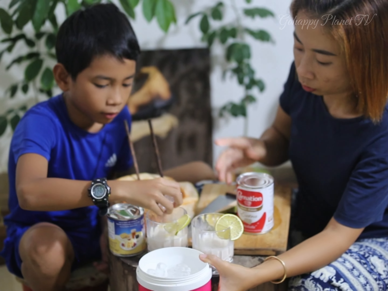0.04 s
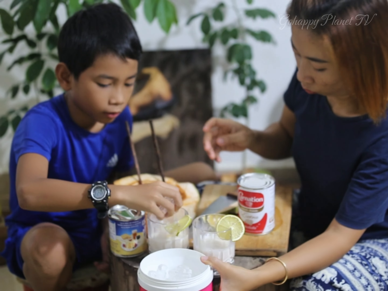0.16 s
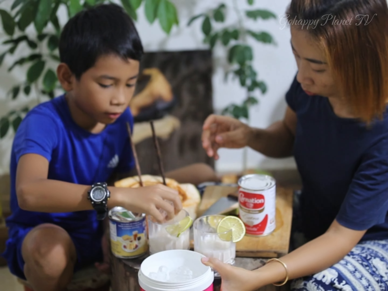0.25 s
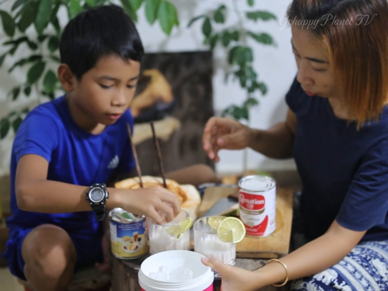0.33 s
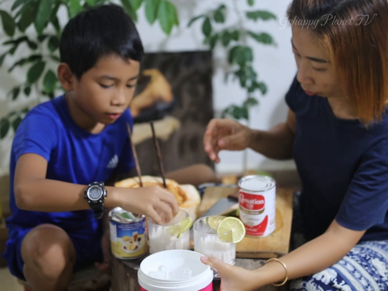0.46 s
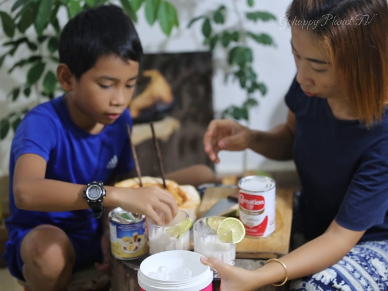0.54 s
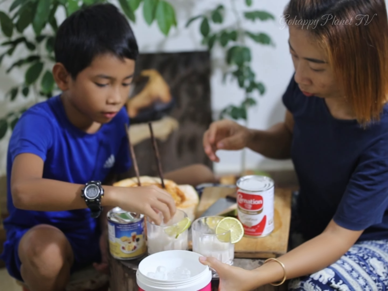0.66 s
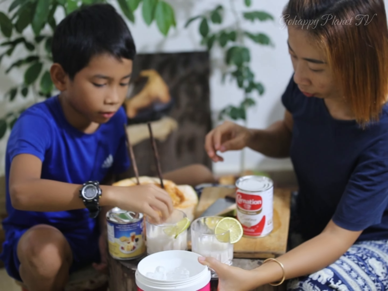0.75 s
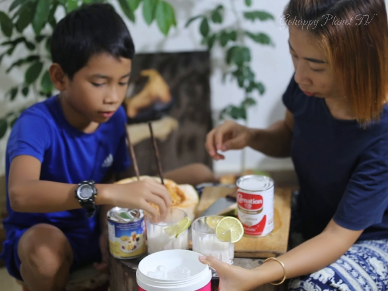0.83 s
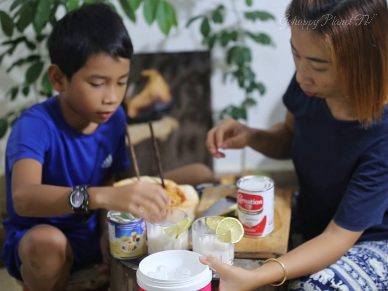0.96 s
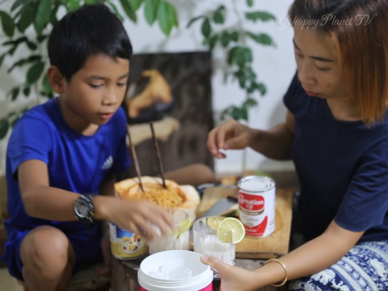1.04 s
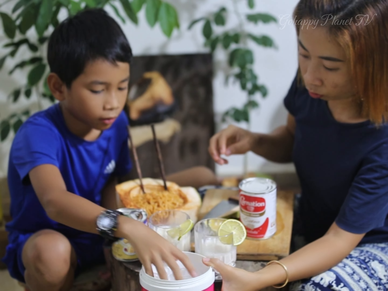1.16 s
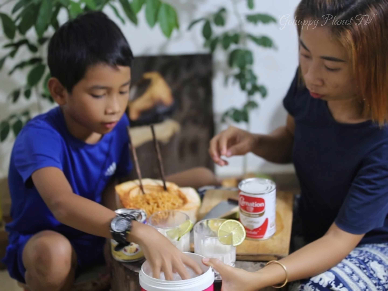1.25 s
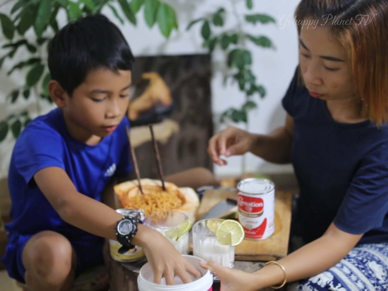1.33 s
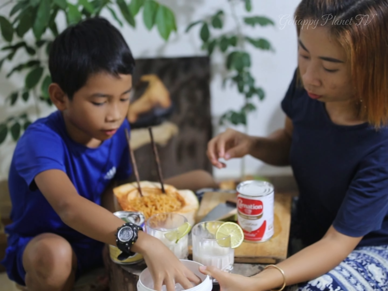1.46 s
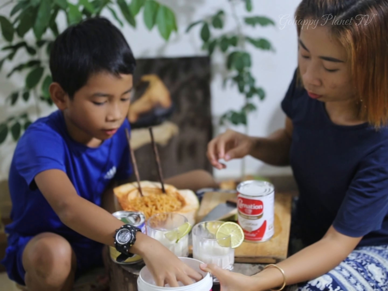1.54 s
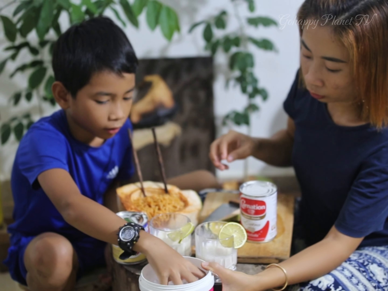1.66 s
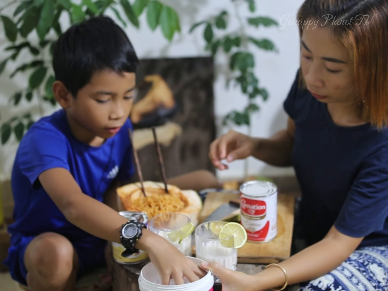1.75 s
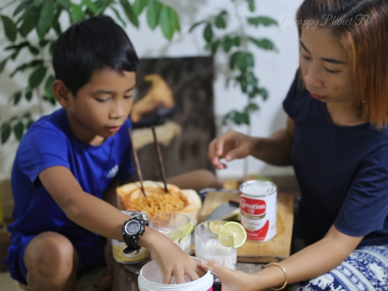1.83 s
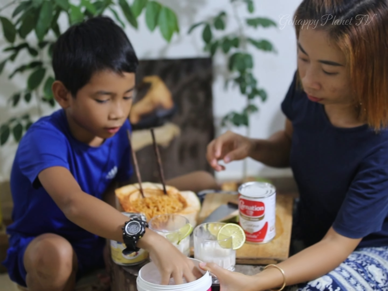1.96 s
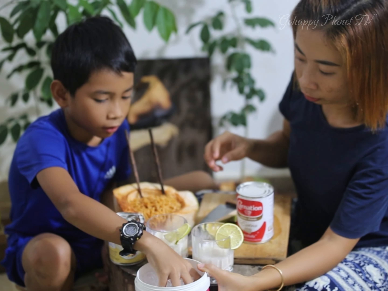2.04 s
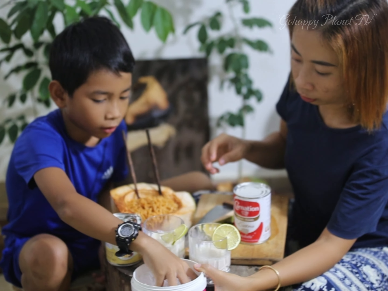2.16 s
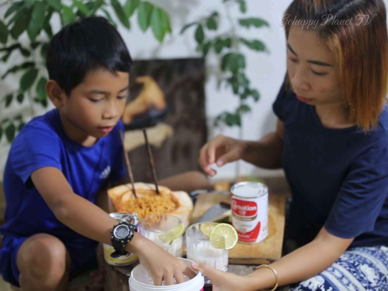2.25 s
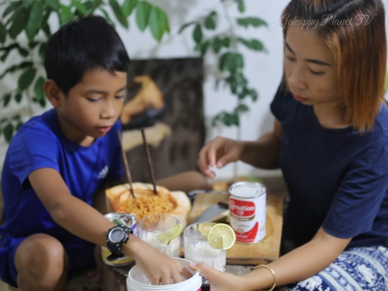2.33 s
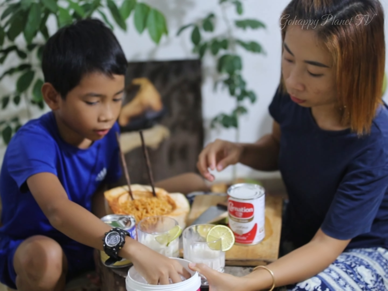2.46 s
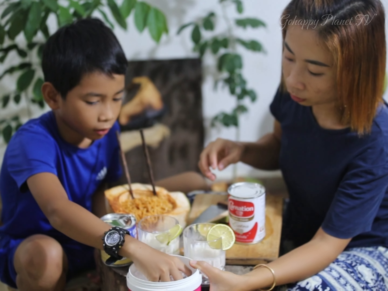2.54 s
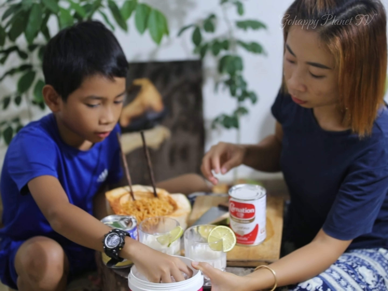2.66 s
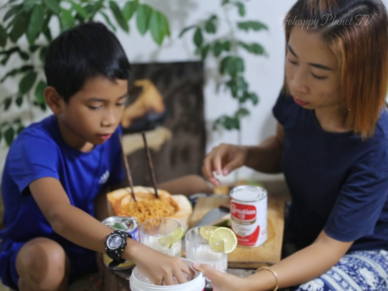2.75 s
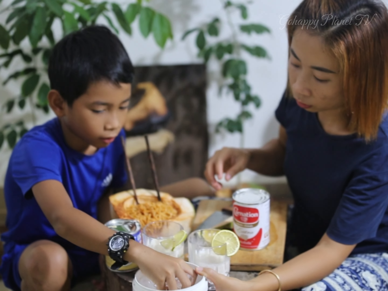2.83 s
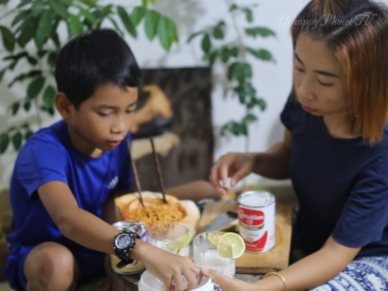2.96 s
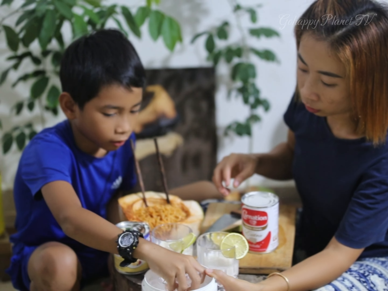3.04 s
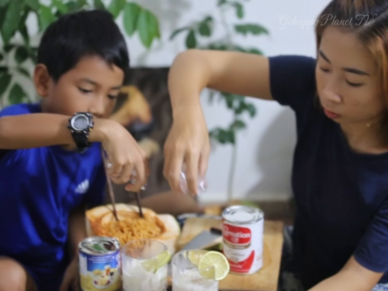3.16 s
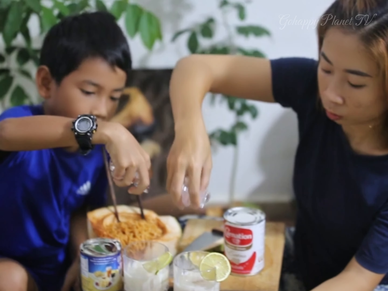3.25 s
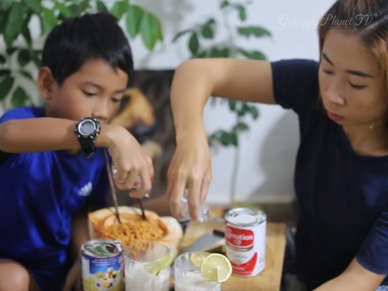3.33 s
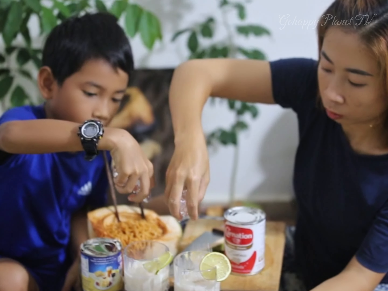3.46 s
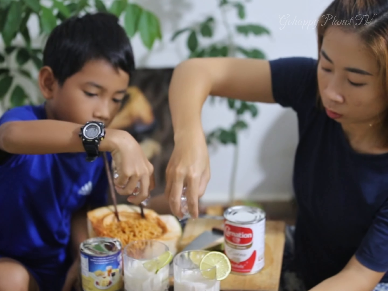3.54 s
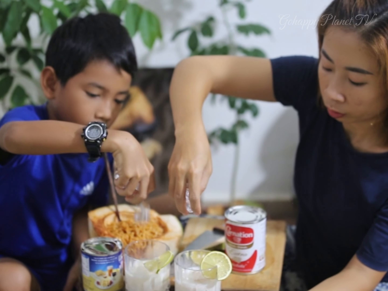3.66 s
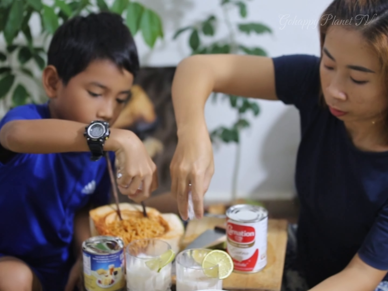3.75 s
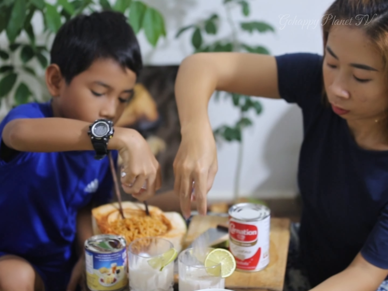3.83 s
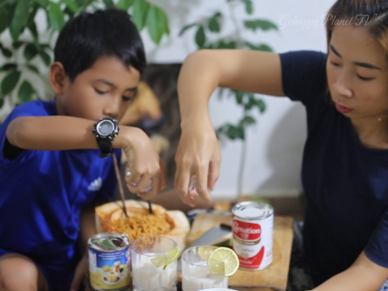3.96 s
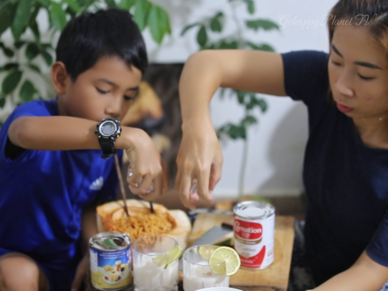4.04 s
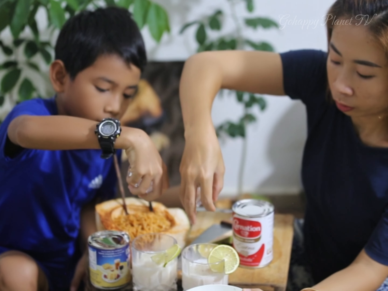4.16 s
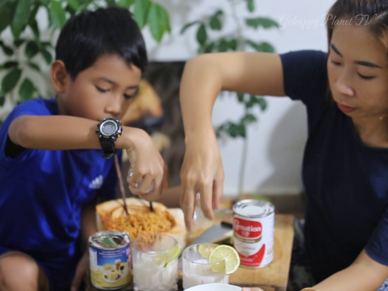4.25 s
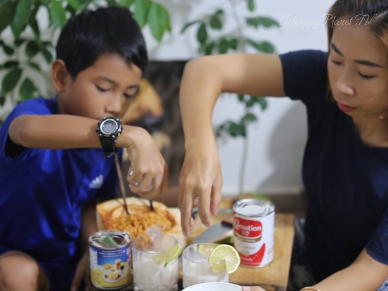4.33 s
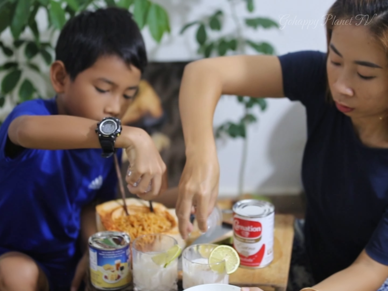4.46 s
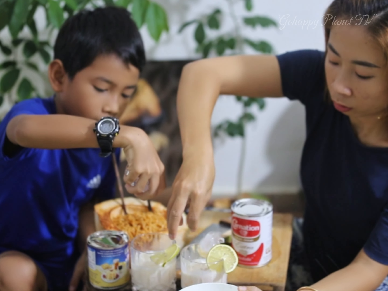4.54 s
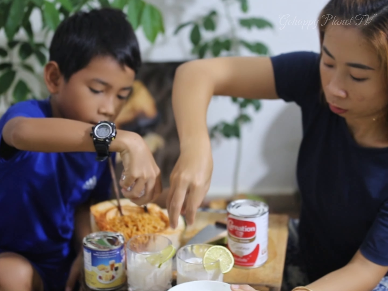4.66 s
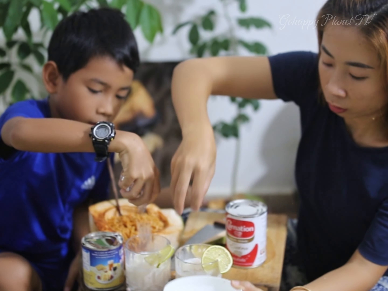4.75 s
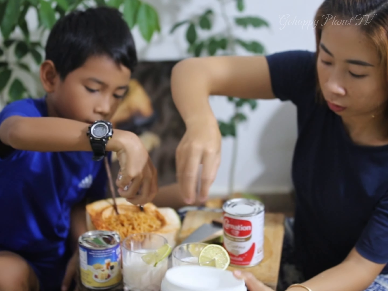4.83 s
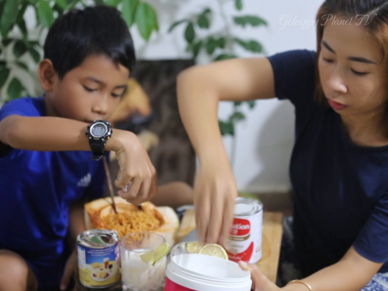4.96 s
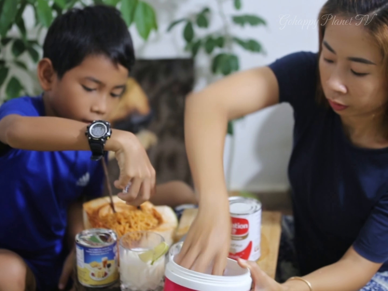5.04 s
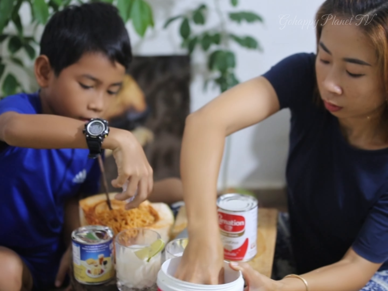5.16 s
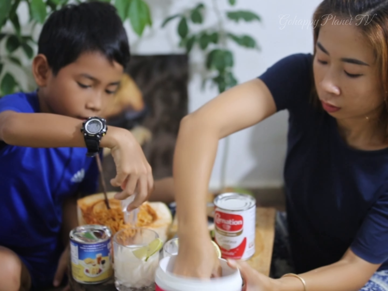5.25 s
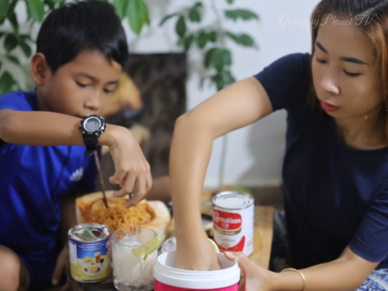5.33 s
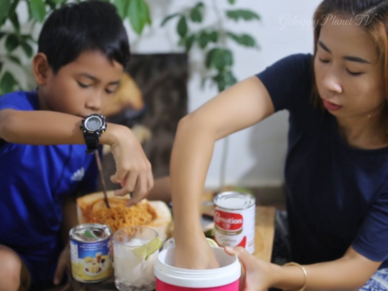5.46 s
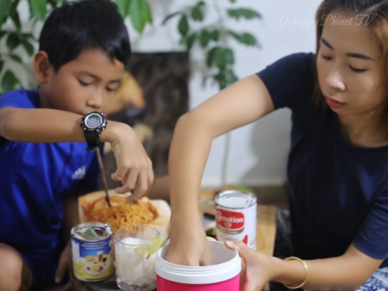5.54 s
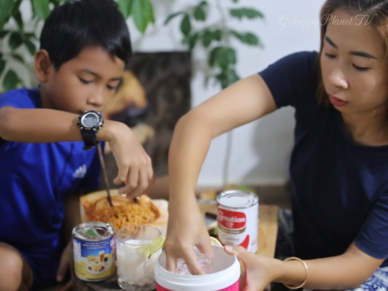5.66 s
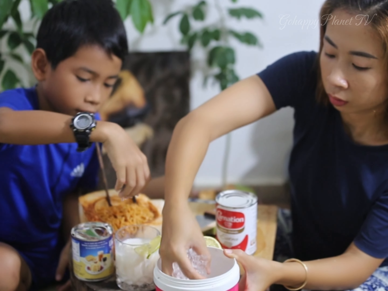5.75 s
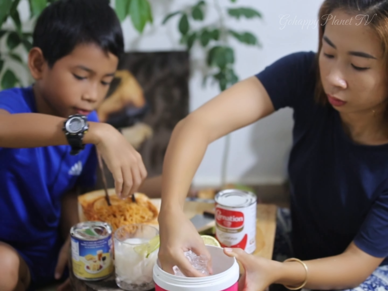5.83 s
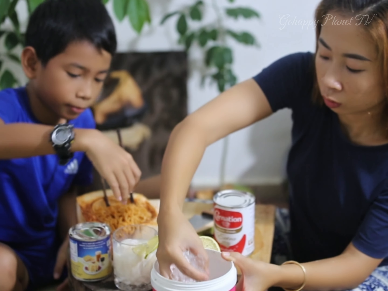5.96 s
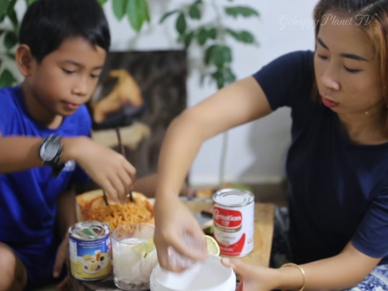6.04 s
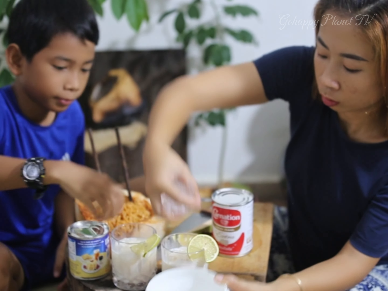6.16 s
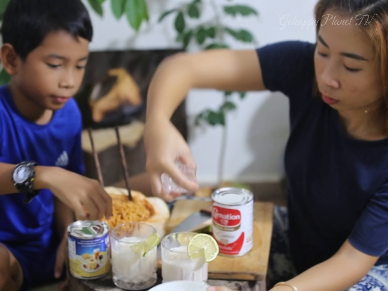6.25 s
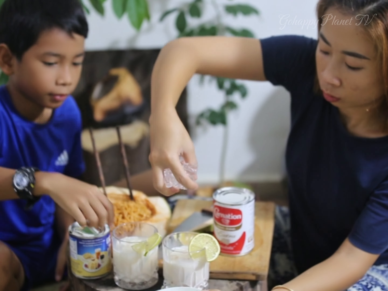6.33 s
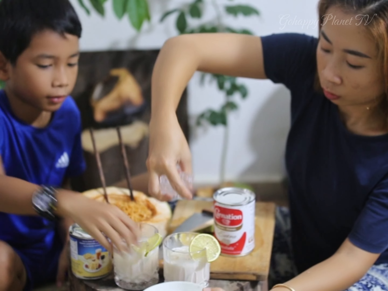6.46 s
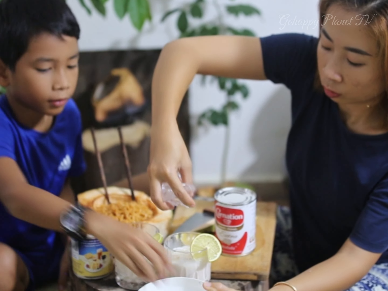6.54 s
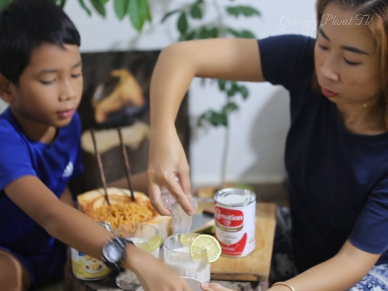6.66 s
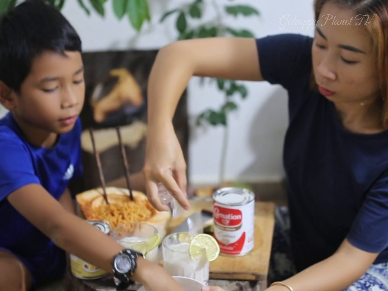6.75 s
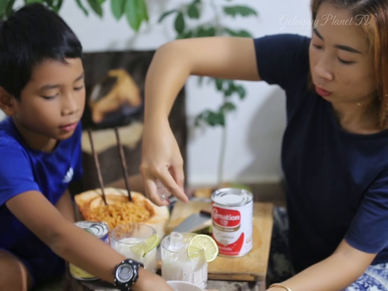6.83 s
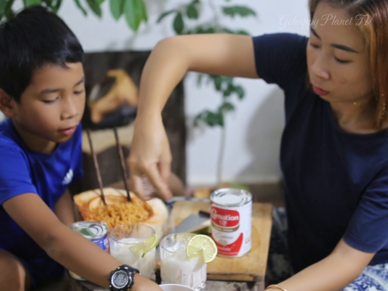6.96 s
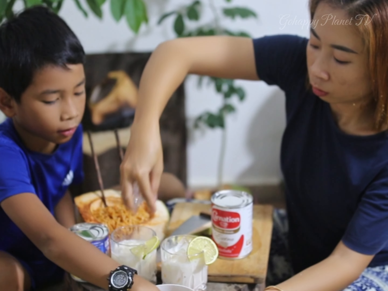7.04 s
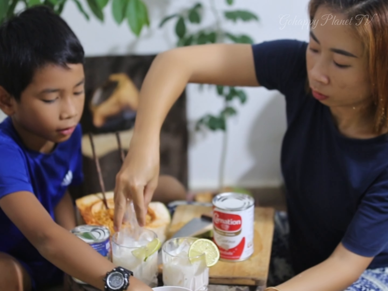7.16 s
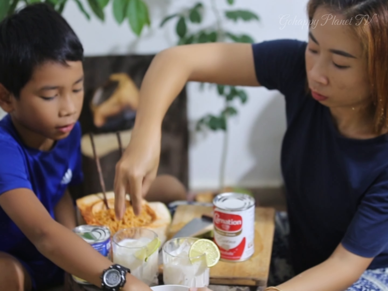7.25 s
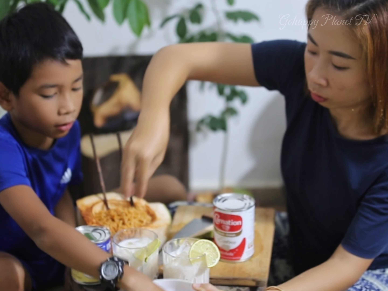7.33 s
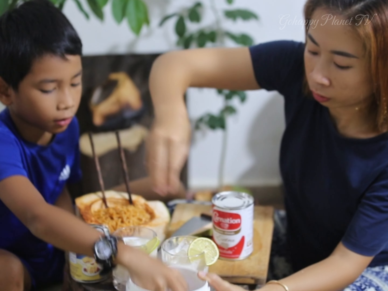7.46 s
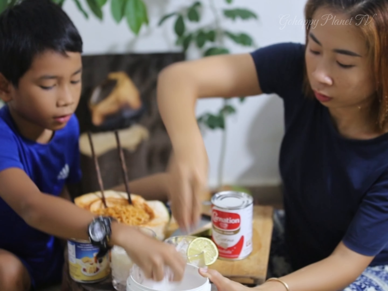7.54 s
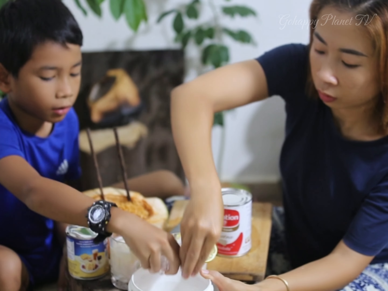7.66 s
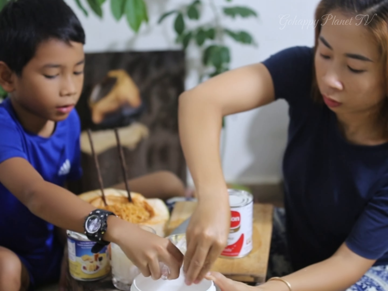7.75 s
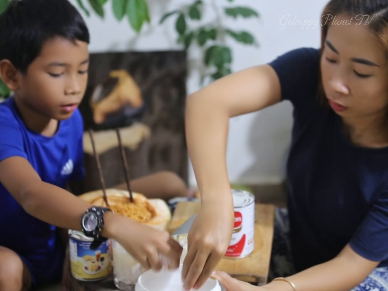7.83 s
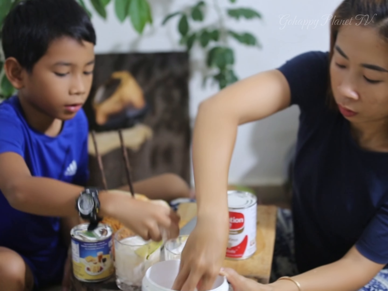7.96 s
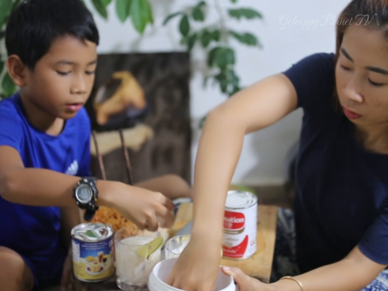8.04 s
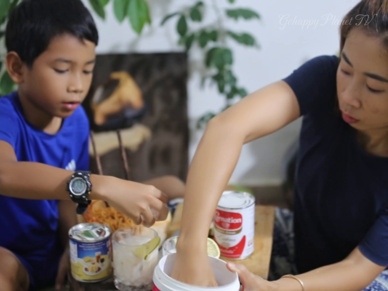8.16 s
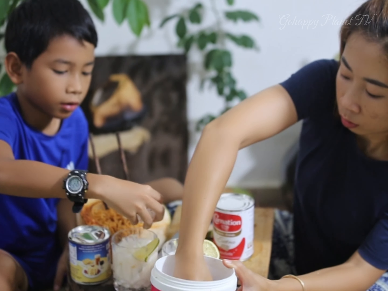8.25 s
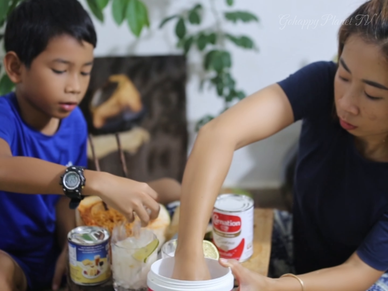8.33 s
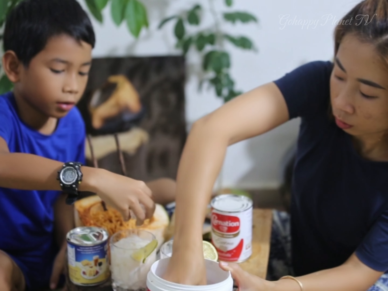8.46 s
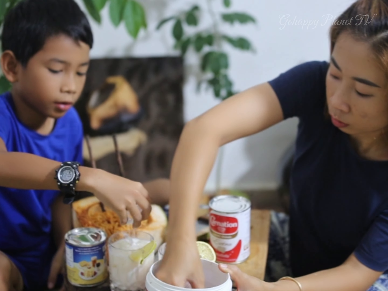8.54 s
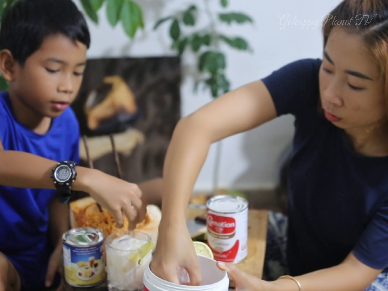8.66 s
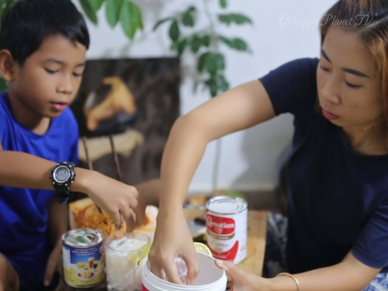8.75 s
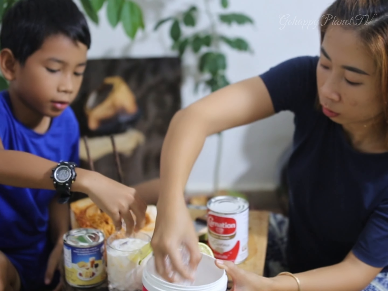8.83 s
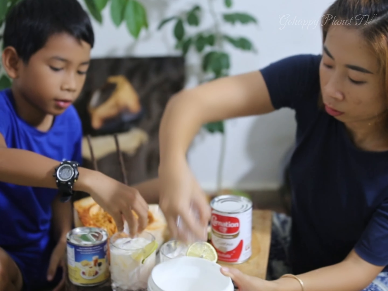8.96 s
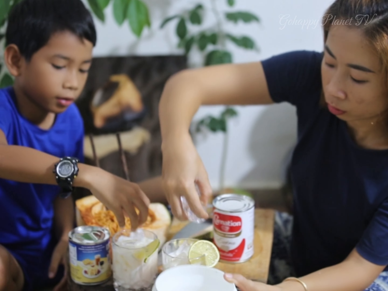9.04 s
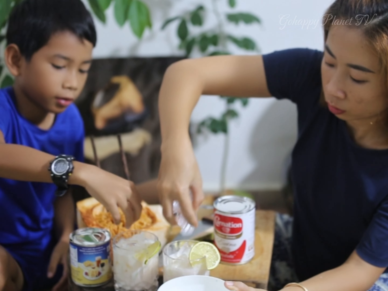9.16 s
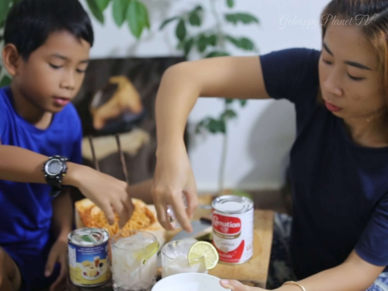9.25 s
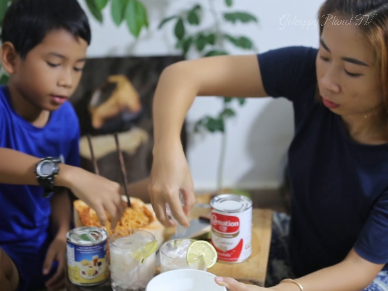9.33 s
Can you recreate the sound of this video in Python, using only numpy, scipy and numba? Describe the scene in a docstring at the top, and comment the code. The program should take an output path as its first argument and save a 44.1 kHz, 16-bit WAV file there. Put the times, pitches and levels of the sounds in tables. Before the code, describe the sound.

Two people take ice by hand from a plastic tub and drop it into glasses on a low table. First short choked glass clinks, then grinding scoops, a momentary dropout, loud cubes landing in glass, and repeated scooping and dropping until the end. Close microphone, short hard reverberation, quiet hum and hiss, faint high whines.

```python
"""Ice cubes into glasses

Hands dig through ice cubes in a plastic bucket and drop them into glasses on a low table.
Noise of dense contacts and short sine grains makes the ice; damped modes make bucket, glass and table.
The glass rings fall in pitch overall as it fills. A small hard room adds a noise tail, over hum,
hiss and faint whines. All is mono on two channels, silent for a moment near 3 s.
"""
import sys
import numpy as np
from scipy import signal
from scipy.fft import rfft, irfft, next_fast_len
from scipy.io import wavfile
from scipy.ndimage import uniform_filter1d
from numba import njit

SR = 44100
rng = np.random.default_rng(int(sys.argv[2]) if len(sys.argv) > 2 else 0)


def master_out(mix):
    """Clip the mix to full scale and print it as 16-bit PCM to the path in sys.argv[1]."""
    frames = np.transpose(np.atleast_2d(mix))
    ceiling = np.clip(frames, -1, 1)
    pcm = np.round(ceiling * 32767).astype(np.int16)
    wavfile.write(sys.argv[1], SR, pcm)


def invert_db(x):
    """Field ratio 10**(x/20) for x, a level in decibels (scalar or array-like)."""
    u = np.asarray(x, float) / 20
    return 10 ** u


N = 414540
T = np.arange(N) / SR
BASS_EDGE_HZ = 320  # small cubes radiate no deep bass


def unit(x):
    """Scale to rms 1."""
    return x / np.sqrt(np.mean(x ** 2))


def colour(x, points):
    """Filter by (freq_hz, level_db) points joined on a log axis; result has rms 1."""
    freq_hz, level_db = np.transpose(points)
    size = next_fast_len(N)
    f = np.arange(size // 2 + 1) * SR / size
    gain_db = np.interp(np.log(f + 1), np.log(freq_hz), level_db, left=-90, right=-90)
    return unit(irfft(rfft(x, size) * invert_db(gain_db), size)[:N])


def high(x, edge_hz):
    """Steep high-pass."""
    return signal.sosfilt(signal.butter(4, edge_hz, "high", fs=SR, output="sos"), x)


def ring(x, freq_hz, t60_s):
    """One damped mode as a two-pole resonator; a unit blow rings at amplitude 1."""
    w = 2 * np.pi * min(freq_hz, SR / 2.2) / SR
    r = np.exp(-np.log(1000) / (t60_s * SR))
    return signal.lfilter([0, r * np.sin(w)], [1, -2 * r * np.cos(w), r ** 2], x)


def width_to_t60(width_hz):
    """Decay time of a mode: the narrower its resonance, the longer it rings."""
    return np.log(1000) / (np.pi * width_hz)


def walk(rate_hz):
    """Random levels held 1 / rate_hz and slewed; spread near 1."""
    hold = int(SR / rate_hz)
    steps = np.repeat(rng.standard_normal(N // hold + 1), hold)
    return 1.48 * uniform_filter1d(steps, hold)[:N]


def contacts(per_s, spread_db):
    """Dense tiny impacts of uneven strength, rms 1."""
    on = rng.random(N) < per_s / SR
    return unit(on * rng.standard_normal(N) * invert_db(spread_db * rng.standard_normal(N)))


def add(out, start_s, x):
    """Mix x in at start_s."""
    i = int(start_s * SR)
    out[i:i + len(x)] += x[:N - i]


def burst(span_s, rise_s, length_s):
    """Rise, a rounded top, then a quick end."""
    t = np.arange(int(span_s * SR)) / SR
    return (1 - np.exp(-t / rise_s)) * np.exp(-(t / length_s) ** 1.65)


def rattle(noise, length_s):
    """A run of small blows with unit energy."""
    envelope = burst(1.001 * len(noise) / SR, length_s / 5, length_s)
    blow = noise * envelope[:len(noise)]
    return blow / np.sqrt(np.sum(blow ** 2))


ROOM_T60_S, ROOM_DB = 0.24, -10.5


def room(x):
    """Direct sound plus a dense tail from close hard walls, duller late."""
    t = np.arange(int(.4 * SR)) / SR
    noise = rng.standard_normal(len(t))
    dull = signal.lfilter([.4], [1, -.6], noise)
    decay = np.exp(-np.log(1000) * t / ROOM_T60_S) * (1 - np.exp(-t / 0.006))
    tail = (dull + .5 * noise * np.exp(-t / 0.14)) * decay
    tail /= np.sqrt(np.sum(tail ** 2))
    return x + invert_db(ROOM_DB) * signal.fftconvolve(x, tail)[:N]


# room and microphone noise spectrum [Hz, relative dB]: freq_hz, level_db
AIR_SPECTRUM = [(12, -15), (20, -6), (37, -16), (93, -14.5), (149, -9), (215, -7.5), (317, -9.5),
                (355, -9.5), (386, -5.5), (456, -19), (1950, -24.5), (5320, -36.5), (15800, -35.5)]
AIR_DB = -55.5
# room hum over time [s, dB]: start_s, level_db
HUM_LEVEL = [(0.0, -53), (3.0, -53), (3.15, -61), (4.6, -57), (7.0, -57), (9.4, -48)]
# faint blurred whines [Hz, Hz, dB]: freq_hz, width_hz, level_db
WHINE_MODES = [(12300, 120, -73.5), (13840, 120, -75)]


def air():
    """Room hum with a wavering bass, microphone hiss, and whines as noise through narrow modes."""
    hiss = invert_db(AIR_DB) * colour(rng.standard_normal(N), AIR_SPECTRUM)
    low = signal.sosfilt(signal.butter(2, 400, fs=SR, output="sos"), hiss)
    hum_db = np.interp(T, *np.transpose(HUM_LEVEL)) + 2.0 * walk(5.5)
    out = high(hiss, 326) + unit(low) * invert_db(hum_db)
    for freq_hz, width_hz, level_db in WHINE_MODES:
        whine = ring(rng.standard_normal(N), freq_hz, width_to_t60(width_hz))
        out += invert_db(level_db) * unit(whine)
    return out


# thuds of glass and elbow on the table [s, dB, Hz]: start_s, level_db, pitch_hz
TABLE_THUDS = [(0.369, -33, 188.5), (0.661, -34.5, 139), (0.846, -29, 302), (3.558, -29, 207),
               (3.835, -29, 204), (3.96, -29, 256), (4.582, -22.5, 198), (4.885, -32, 312),
               (6.234, -33, 216), (6.321, -36, 300), (6.439, -41.5, 222), (9.066, -32, 203.5),
               (9.27, -41, 167)]


def table():
    """Soft pushes ring two modes of the table top."""
    out = np.zeros(N)
    push = np.append(np.hanning(90), np.zeros(int(.2 * SR)))
    for start_s, level_db, pitch_hz in TABLE_THUDS:
        thud = ring(push, pitch_hz, 0.066) + 0.46 * ring(push, 1.53 * pitch_hz, 0.16)
        add(out, start_s, invert_db(level_db) * thud / push.sum())
    return high(out, 109)


# dry ticks of cracking ice [s, dB, dB re low ring]: start_s, level_db, bright_rel_db
CRACK_TICKS = [(0.211, -15.5, -16.5), (1.413, -30, -11), (3.1627, -35.5, -20), (3.216, -54, 12),
               (3.2228, -19.5, -6), (3.237, -48, -23), (4.8732, -27.5, -4), (5.1487, -30, -14),
               (5.9668, -41, 7), (7.221, -33.5, 0), (7.3074, -26, -2.5), (7.435, -24, -12), (8.79, -26, -1),
               (8.9605, -30, -2.5), (9.064, -32.5, -10)]


def cracks():
    """A crack is one sharp pulse into two brief rings."""
    out, pulse = np.zeros(N), np.append(1., np.zeros(400))
    for start_s, level_db, bright_rel_db in CRACK_TICKS:
        tick = ring(pulse, 2580, 0.0033) + invert_db(bright_rel_db) * ring(pulse, 7100, 0.002)
        add(out, start_s, invert_db(level_db) * tick)
    return high(out, BASS_EDGE_HZ)


# cubes striking a glass wall [s, dB, dB, s]: start_s, level_db, upper_rel_db, rattle_s
GLASS_STRIKES = [(.210, -16.5, -1.5, .0066), (.224, -11.5, -13, 0.0099), (.305, -31, -13, .012),
                 (.350, -37.5, -14, 0.0081), (.450, -32, -14.5, .018), (.524, -40.5, -6, .02),
                 (0.659, -35, -13, 0.013), (.751, -24, -9.5, 0.011), (.788, -20.5, -9, .015),
                 (.830, -29.5, -5, 0.019), (.870, -26, -9.5, 0.03), (1.048, -37.5, -16, .018),
                 (1.1, -39, -12, .06), (1.18, -41, -15, .05), (1.41, -37, -20, .04), (1.54, -34, -15, .07),
                 (3.552, -15.5, -13, 0.034), (3.575, -21.5, -1.5, 0.032), (3.829, -22.5, -1.5, 0.017),
                 (3.960, -24.5, -15, 0.016), (4.421, -19.5, -10, 0.035), (4.449, -26, -1, 0.015),
                 (4.573, -32, 4.5, 0.0053), (4.874, -19, -4, 0.014), (4.947, -26.5, -3.5, 0.028),
                 (5.399, -19.5, -1.5, 0.015), (6.131, -54.5, 3, 0.02), (6.812, -28.5, -9, .023),
                 (6.886, -32, -14, 0.027), (6.949, -32, -8, 0.006), (7.274, -21.5, -7, 0.014),
                 (7.345, -30, -20, .022), (8.237, -16.5, -12.5, .012), (8.7, -27.5, -14, 0.04),
                 (8.89, -30.5, -23, .04), (9.116, -32.5, -11, 0.087), (9.2, -43, -20, .05),
                 (9.316, -32, -13, 0.011), (9.363, -30.5, -19.5, 0.023)]
# glass wall modes [multiple of lowest ring, dB, s]: ratio, level_db, t60_s
GLASS_MODES = [(1.001, -5.5, 0.5), (1.025, -30.5, 0.2), (1.54, -39.5, 0.081), (2.488, -7, 0.18),
               (2.54, -8.5, 0.058), (4.28, -10.5, 0.097), (4.4, -9.5, 0.12), (6.7, -14.5, 0.052)]
# lowest ring of the glass being filled [s, Hz]: start_s, pitch_hz
FILL_PITCH = [(.36, 2148), (.44, 2049), (3.9, 2060), (5.0, 2031), (5.4, 1953), (6.85, 1858), (7.3, 1929),
              (8.24, 1816), (9.12, 1757), (9.3, 1828)]
UPPER_SAG = 0.41  # share of the lowest ring's log-pitch fall that the upper rings follow
CHOKE_S = 0.029  # with rattle_s, sets how soon a hand or ice stops the ring
TOUCH_DB = 2.5  # ice resting on the wall damps the ring unevenly
# loose ice keeps the glass singing: under a strike, its settling time, under the stirring
TREMBLE_DB, SETTLE_T60_S, SHAKEN_DB = -36, 0.68, -18


def strike_glass(noise, rattle_s, upper_rel_db, low_hz, upper_hz):
    """One firm blow and a short rattle ring the wall until a touch chokes it."""
    blow = 0.71 * rattle(noise, rattle_s)
    blow[0] += .9
    wall = np.zeros(len(blow))
    for ratio, level_db, t60_s in GLASS_MODES:
        if ratio > 1.2:
            wall += invert_db(level_db + upper_rel_db) * ring(blow, ratio * upper_hz, t60_s)
        else:
            wall += invert_db(level_db) * ring(blow, ratio * low_hz, t60_s)
    return wall * np.exp(-(T[:len(wall)] / (CHOKE_S + rattle_s)) ** 2)


def glasses():
    """Struck glass walls, and a trembling ring kept up by loose ice; pitch follows the filling."""
    out = np.zeros(N)
    low_hz = np.interp(T, *np.transpose(FILL_PITCH))
    upper_hz = low_hz[0] * (low_hz / low_hz[0]) ** UPPER_SAG
    tremble = invert_db(np.interp(T, *np.transpose(STIR_DRIVE)[:2]) + SHAKEN_DB)
    for start_s, level_db, upper_rel_db, rattle_s in GLASS_STRIKES:
        at = int(start_s * SR)
        noise = rng.standard_normal(int(.25 * SR))
        strike = strike_glass(noise, rattle_s, upper_rel_db, low_hz[at], upper_hz[at])
        add(out, start_s, invert_db(level_db) * strike)
        add(tremble, start_s, invert_db(level_db + TREMBLE_DB - 60 * T[:SR] / SETTLE_T60_S))
    out *= invert_db(TOUCH_DB * walk(160))
    voices = ((low_hz, -4.5, 80), (2.49 * upper_hz, -19.5, 150.3), (3.5 * upper_hz, -23, 250.3))
    for pitch_hz, rel_db, waver_hz in voices:
        phase = 2 * np.pi * np.cumsum(pitch_hz) / SR
        # countless tiny touches make the ring waver in strength and phase
        waver = walk(waver_hz) * np.sin(phase) + walk(waver_hz) * np.cos(phase)
        out += tremble * invert_db(rel_db) * waver
    return out


# single cubes clacking with a brief pitch [s, dB, Hz, s]: start_s, level_db, pitch_hz, rattle_s
CUBE_CLACKS = [(0.21, -37.5, 1280, 0.015), (.213, -18, 3100, 0.018), (0.443, -27.5, 2940, .03),
               (.52, -23.5, 1450, .015), (.751, -13, 3060, 0.059), (.821, -13, 1170, 0.054),
               (.85, -25.5, 432, 0.022), (0.88, -13.5, 3530, 0.03), (.891, -11, 1420, 0.03),
               (1.044, -21.5, 925, 0.0052), (1.41, -24.5, 1520, 0.011), (1.998, -13.5, 3700, 0.048),
               (3.262, -31.5, 2010, 0.007), (3.553, -12, 1660, 0.032), (3.56, -8.5, 1840, 0.041),
               (3.555, -6.5, 2860, 0.027), (3.599, -34, 1500, 0.027), (3.842, -7.5, 3230, .026),
               (3.868, -19.5, 1290, 0.023), (3.96, -5, 4600, 0.038), (3.96, -6, 3040, 0.026),
               (4.001, -29, 1520, 0.1), (4.198, -28.5, 1970, 0.017), (4.441, -12, 5200, 0.06),
               (4.614, -14, 1580, 0.04), (4.714, -14.5, 1690, 0.025), (4.876, -5, 3390, 0.024),
               (4.946, -13.5, 3520, 0.024), (6.135, -29.5, 5600, 0.014), (6.24, -38, 1040, 0.012),
               (6.316, -40.5, 1140, .009), (6.809, -15.5, 6800, .042), (7.068, -14, 6560, .014),
               (7.26, -10.5, 5000, 0.058), (7.432, -15, 3880, .007), (8.24, -17, 1480, 0.037),
               (8.962, -19, 1650, 0.033), (9.119, -16, 4050, 0.047), (9.2, -21.5, 3100, .022),
               (9.312, -23, 3630, .01)]


def clacks():
    """A loose cube rings broad and brief while it rattles."""
    out = np.zeros(N)
    for start_s, level_db, pitch_hz, rattle_s in CUBE_CLACKS:
        blow = rattle(rng.standard_normal(int(.2 * SR)), rattle_s)
        add(out, start_s, invert_db(level_db) * ring(blow, pitch_hz, 24 / pitch_hz))
    return high(out, BASS_EDGE_HZ)


# bucket wall and air modes [Hz, Hz, dB]: freq_hz, width_hz, level_db
BUCKET_MODES = [(461.4, 28, -5), (545, 37.4, -1), (586, 25, -10.5), (644.6, 55, -8.5), (783, 210, -10)]
BUCKET_EDGE_HZ = 350  # the wall is too small to sound below this


def bucket(boom):
    """Uneven bumps ring the damped modes of bucket wall and air."""
    bumps = boom * contacts(1200, 5.4)
    wall = np.zeros(N)
    for freq_hz, width_hz, level_db in BUCKET_MODES:
        mode = ring(bumps, freq_hz, width_to_t60(width_hz))
        wall += invert_db(level_db) * np.sqrt(width_hz) * mode
    return high(invert_db(-42) * wall, BUCKET_EDGE_HZ)


# fine crackle spectrum [Hz, relative dB]: freq_hz, level_db
CRACKLE_SPECTRUM = [(2940, 0.5), (5000, -2.5), (5670, -5.5), (6740, -4.5), (7820, -10.5), (11300, -8.5),
                    (14000, -16), (15800, -22)]


def crackle(fine):
    """Very dense light contacts, coloured bright."""
    return fine * colour(contacts(7000, 0.86), CRACKLE_SPECTRUM)


@njit
def pings(start, hz, cycles, size, length):
    """Each grain is a sine that dies within its number of cycles."""
    out = np.zeros(length)
    for g in range(len(start)):
        pole = np.exp((2j * np.pi - 3 / cycles[g]) * hz[g] / SR)
        z = size[g] + 0j
        for i in range(start[g], min(length, start[g] + int(2 * cycles[g] * SR / hz[g]))):
            z *= pole
            out[i] += z.imag
    return out


def crunch(per_s, low_hz, high_hz, cycles, spread_db):
    """Many small cubes touching, each with its own short ring; rms 1."""
    when, pitch, length, strength = rng.random((int(per_s * N / SR), 4)).T
    start = (when * N).astype(np.int64)
    hz = low_hz * (high_hz / low_hz) ** pitch
    size = invert_db(-spread_db * np.log(strength + 0.099))  # few strong, many weak
    return unit(pings(start, hz, cycles * (.5 + length), size, N))


# grinding cube spectrum [Hz, relative dB]: freq_hz, level_db
ICE_SPECTRUM = [(470, -49), (800, -11), (917, -5), (1230, -4.5), (1320, 0), (1810, 2), (1960, 2.5),
                (3780, -1.5), (5630, -20), (7000, -24.5), (9100, -58.5), (15400, -120)]


def cubes(grinding):
    """Coloured contact noise and short pitched grains under one level."""
    grind = colour(contacts(5000, 1.3), ICE_SPECTRUM) + invert_db(-3.5) * crunch(700, 1093.6, 4830, 27.0, 1.07)
    return high(invert_db(-5) * grinding * grind, BASS_EDGE_HZ)


# hands stirring the ice [s, dB, dB re drive]: start_s, drive_db, boom_rel_db
STIR_DRIVE = [(0.0, -59.5, 6), (0.39, -52.5, -1), (0.91, -63.5, 8), (1.15, -51, -1), (1.46, -55, -4),
              (1.53, -34, -1.5), (1.72, -60, -1), (1.96, -39, -2.5), (2.24, -48, -3.5), (2.39, -47, -7),
              (2.67, -46.5, -1), (2.9, -46.5, 0), (3.02, -48, 3), (3.06, -74.5, 16), (3.8, -61.5, -15),
              (4.01, -39.5, -28), (4.27, -68, 2), (4.5, -42.5, -12.5), (4.75, -52.5, -24),
              (5.11, -55.5, 10.5), (5.18, -26.5, -2.5), (5.32, -29.5, -16), (5.47, -40, -2.5),
              (5.98, -38.5, -10), (6.12, -47, -9), (6.36, -68.5, 9.5), (6.7, -60, -10.5),
              (6.92, -35.5, -33), (7.02, -40.5, -1), (7.24, -27, -11), (7.39, -42.5, -8), (7.63, -44, -0.5),
              (8.07, -52.5, 1.5), (8.18, -29.5, 2.5), (8.67, -28, -1.5), (8.78, -36, -4),
              (8.94, -36.5, 0.5), (9.11, -48.5, 0.5), (9.4, -44, -10)]
# cubes knocking together [s, dB, dB, dB, s]: start_s, drive_db, boom_rel_db, crackle_rel_db, length_s
CUBE_KNOCKS = [(0.209, -34, -36, -13, 0.077), (0.4285, -35, -6, -8.5, 0.022), (0.52, -43, -14, -16, 0.037),
               (0.656, -47.5, -4, -17, 0.04), (0.7106, -41, -21, -4, 0.05), (0.741, -41, -27, 1, 0.17),
               (1.042, -53, -25, -7, 0.12), (1.408, -35, -5, -15, 0.068), (1.70, -34, -1, -11, 0.057),
               (2.41, -32, -4.5, -14.5, 0.036), (2.811, -39, -9, -8.5, 0.055), (3.8246, -25, -30, 1, 0.038),
               (4.419, -42, -24, 4.5, 0.084), (4.5695, -38.5, -17, 1.5, 0.065),
               (4.675, -36.5, -12, -1, 0.018), (4.87, -27.5, -37, 9, 0.04), (4.927, -37, -33, -1, 0.057),
               (5.14, -23.5, -1.5, -13, 0.039), (5.403, -25.5, -30, -2.5, 0.043),
               (5.7915, -34.5, 0.5, -0.5, 0.026), (5.843, -35.5, -19, 0, 0.037),
               (5.9565, -35.5, 2.5, 0, 0.041), (6.541, -49.5, -14, -8, 0.053),
               (7.069, -25.5, -1.5, -3.5, 0.035), (7.43, -48, -37, 11, 0.028),
               (7.534, -31.5, 10, -17, 0.015), (7.6, -34.5, -3, -6.5, 0.11),
               (7.714, -32, -1.5, -0.5, 0.044), (8.0045, -40.5, -22, -6.5, 0.016),
               (8.092, -39, 3.5, -11, 0.19), (8.6462, -27.5, 3.5, -11.5, 0.062),
               (8.788, -32, -10, -8.5, 0.06), (8.888, -25.5, 5.5, -26, 0.032),
               (8.9585, -30, -3, -17, 0.028), (9.0658, -38.5, 2.5, -11, 0.06),
               (9.312, -36.5, -27, -9.5, 0.091)]
# cubes sliding past each other, same columns: start_s, drive_db, boom_rel_db, crackle_rel_db, length_s
CUBE_SLIDES = [(0.834, -28.5, -10, -7, 0.021), (0.868, -36, -14, -14, 0.055),
               (1.269, -30.5, 0.5, -13, 0.05), (1.33, -30, 0, -12, 0.058), (1.558, -33, -11, -4, 0.093),
               (1.847, -34, -5, -14.5, 0.076), (1.99, -20, -3.5, -9, 0.049),
               (2.084, -32.5, -4, -1.5, 0.056), (2.258, -30, -3, -11.5, 0.13),
               (2.655, -30.5, -9.5, -11.5, 0.07), (2.86, -34.5, 1, -7, 0.034), (2.972, -39, -5, 1.5, 0.058),
               (3.255, -40, -13.5, -14, 0.019), (3.544, -17, -41, -7.5, 0.045),
               (3.94, -19.5, -32, -7.5, 0.035), (4.269, -45.5, -6.5, -2, 0.062),
               (4.628, -39, -11, 3, 0.015), (4.695, -27.5, -37, -10.5, 0.041), (5.109, -34, 5, -4.5, 0.044),
               (5.29, -25, 1, -4.5, 0.081), (5.52, -26, -1, -10.5, 0.042),
               (5.6356, -32.5, -20, -2.5, 0.071), (6.7, -48.5, -9, -12, 0.075),
               (6.774, -36.5, -9, -1.5, 0.065), (6.805, -34, -5.5, -2.5, 0.06),
               (6.878, -28, -9.5, -6.5, 0.055), (7.281, -26, -6.5, -3.5, 0.05),
               (8.125, -26, -10, -11.5, 0.34), (8.27, -39, -7, -14, 0.04), (8.314, -24.5, 7, -16, 0.037),
               (8.4094, -26, 2, -11, 0.11), (8.49, -34.5, 2, -1, 0.056), (9.12, -31.5, -22, -13, 0.042)]
STIR_CRACKLE_REL_DB = -11
KNOCK_RISE_S, SLIDE_RISE_S = 0.0017, 0.013


def ice():
    """Stirring, knocks and slides sum in power and drive cubes, bucket and fine crackle."""
    start_s, drive_db, boom_rel_db = np.transpose(STIR_DRIVE)
    stir_db = np.interp(T, start_s, drive_db) + 1.2 * walk(30)  # cubes jam and let go
    boom_db = stir_db + np.interp(T, start_s, boom_rel_db)
    power = invert_db(np.array([stir_db, boom_db, stir_db + STIR_CRACKLE_REL_DB])) ** 2
    for events, rise_s in ((CUBE_KNOCKS, KNOCK_RISE_S), (CUBE_SLIDES, SLIDE_RISE_S)):
        for start_s, drive_db, boom_rel_db, crackle_rel_db, length_s in events:
            shape = burst(.3, rise_s, length_s)
            for voice, rel_db in zip(power, (0, boom_rel_db, crackle_rel_db)):
                add(voice, start_s, (invert_db(drive_db + rel_db) * shape) ** 2)
    grinding, boom, fine = np.sqrt(power)
    return cubes(grinding) + bucket(boom) + crackle(fine)


TICK_ROOM = .3  # cracks are so close that the walls add little


def scene():
    """All sources reach the one microphone."""
    ticks = cracks()
    in_room = ice() + clacks() + glasses() + table() + TICK_ROOM * ticks
    mono = room(in_room) + (1 - TICK_ROOM) * ticks + air()
    return np.array([mono, mono])


def low_pass(x):
    """Removes everything above the highest recorded frequency."""
    return signal.sosfilt(signal.butter(12, 16830, fs=SR, output="sos"), x)


# brief silence [s, s]: start_s, end_s
MUTE_SPAN = (3.028, 3.143)


def record(dry):
    """The sound drops to silence for a moment and fades back in quickly."""
    start_s, end_s = MUTE_SPAN
    fade_out, fade_in = (start_s - T) / 0.00074, (T - end_s) / 0.002
    gate = np.clip(np.maximum(fade_out, fade_in), 0, 1)
    return low_pass(dry * gate)


dry = scene()
out = record(dry)
master_out(out)
```